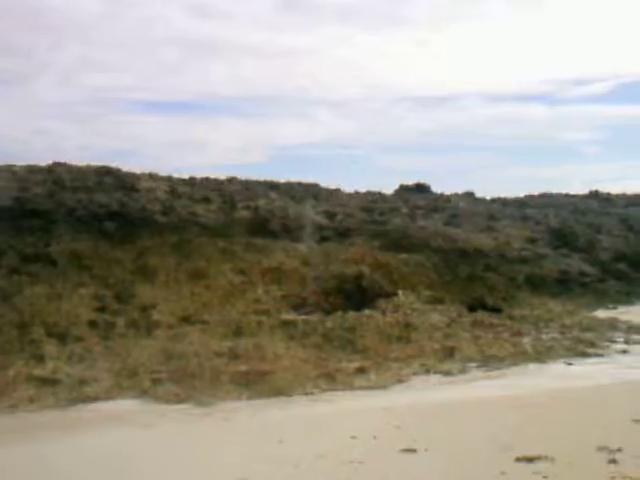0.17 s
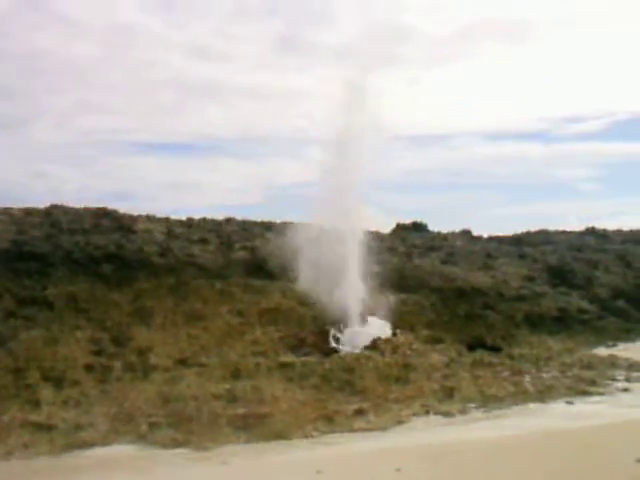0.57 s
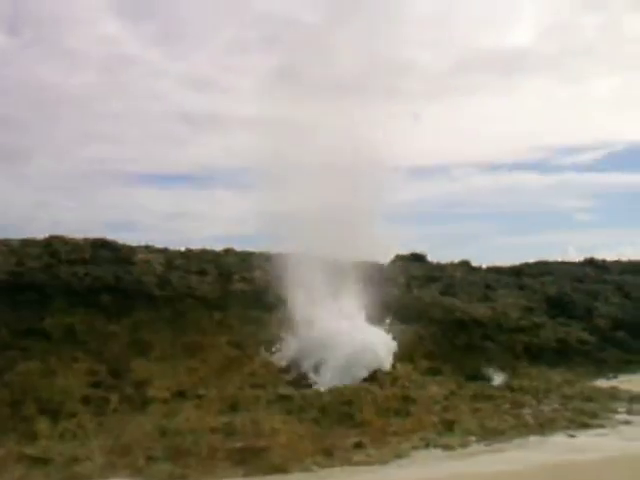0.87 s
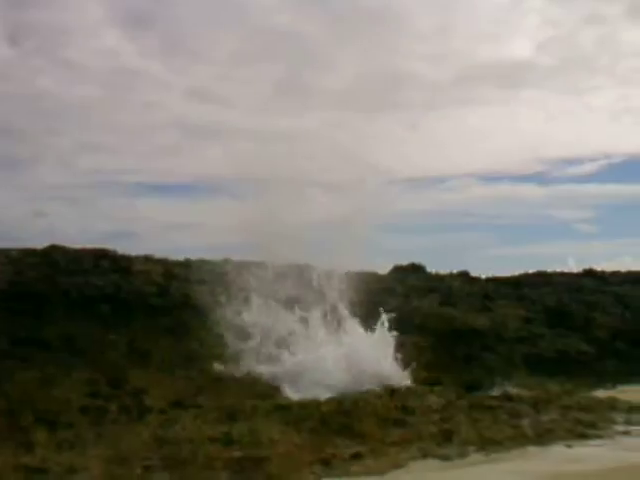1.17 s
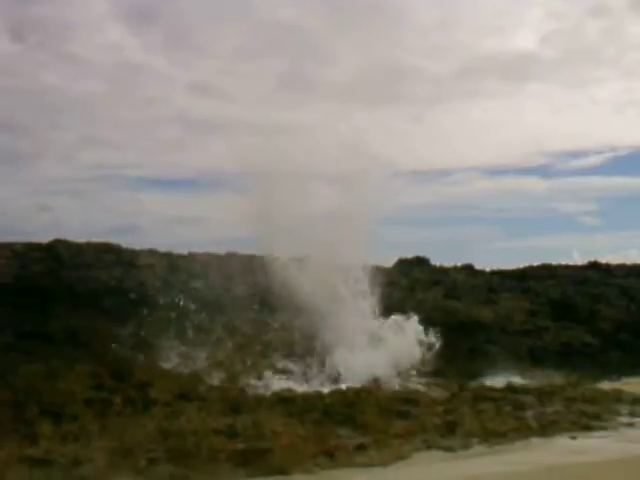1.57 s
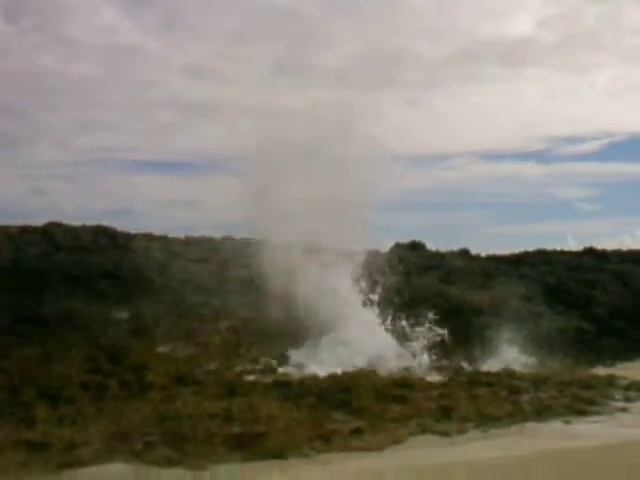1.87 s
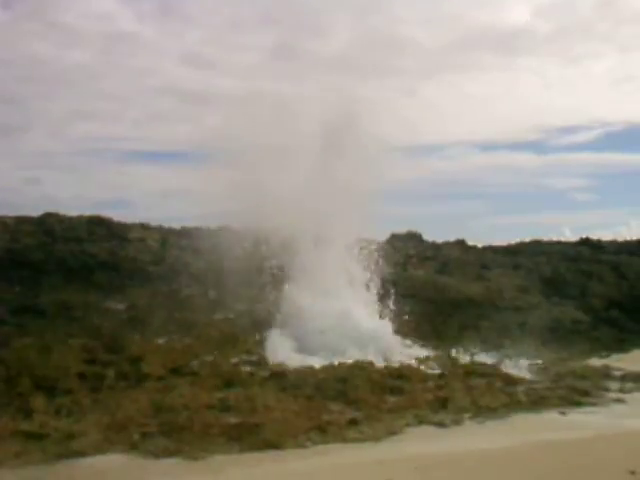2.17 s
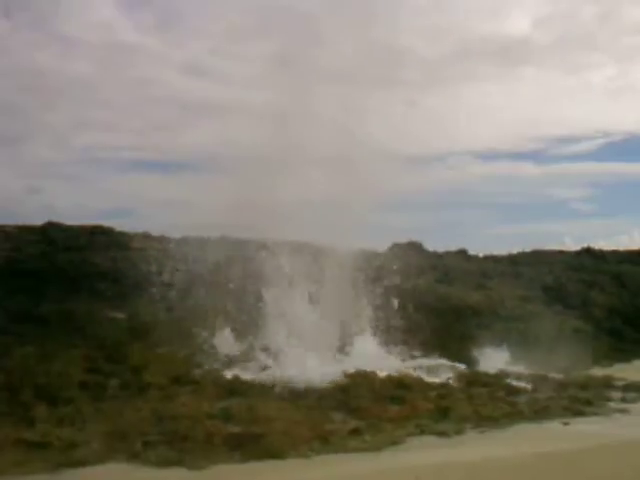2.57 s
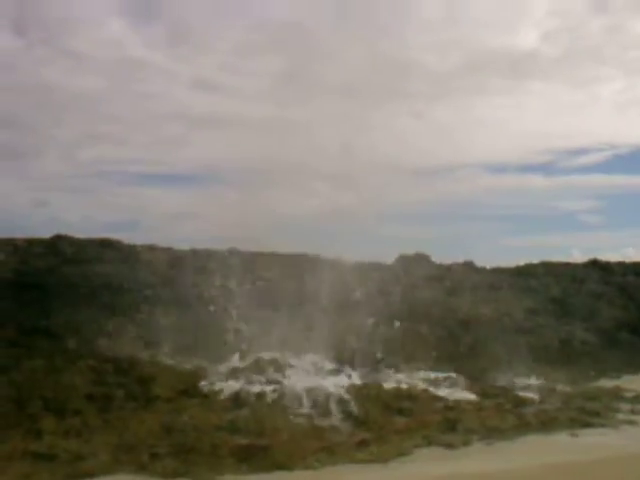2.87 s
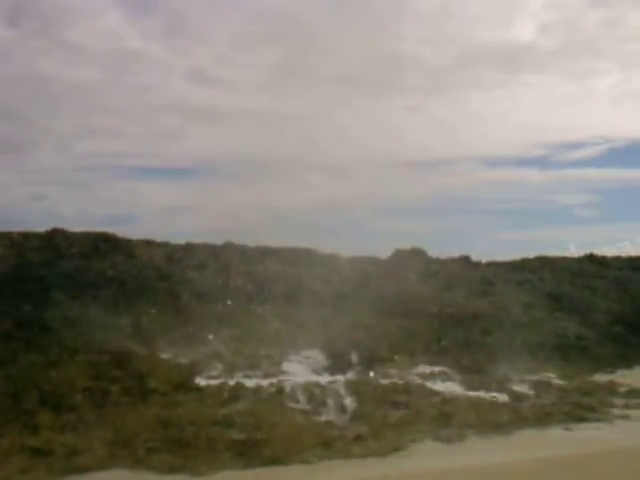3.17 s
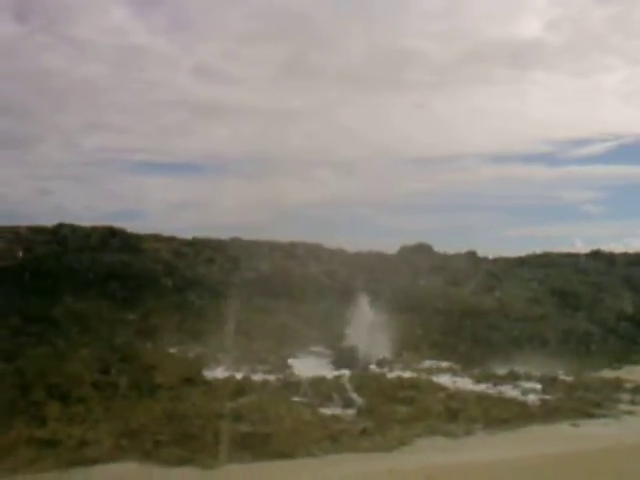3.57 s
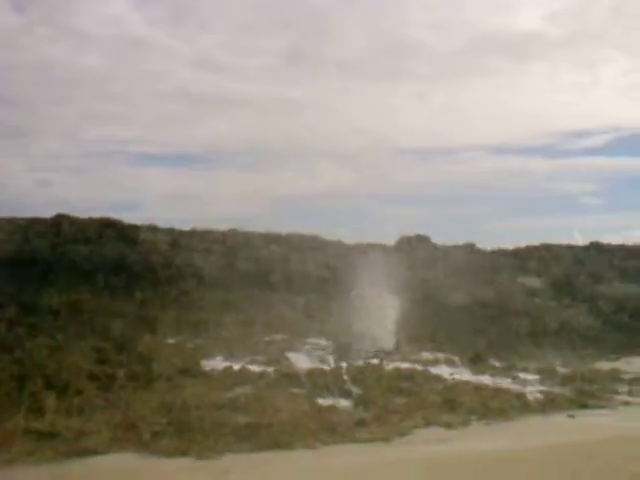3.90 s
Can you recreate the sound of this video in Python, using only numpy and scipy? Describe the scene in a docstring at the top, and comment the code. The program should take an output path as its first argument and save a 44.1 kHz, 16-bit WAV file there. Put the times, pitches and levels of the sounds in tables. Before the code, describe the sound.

A microphone pops right at the start, over a faint, steady hiss of sea. By 0.3 seconds a rocky blowhole begins to boom, with a low thump of water inside the cave. Air and sea water rush out in a hollow, slightly ringing roar, loudest from about 0.6 to 0.9 seconds, with the hardest thump near 0.6. After a brief dip, a second surge runs from about 1.2 to 2.2 seconds, with several more thumps and hissing spray. The boom and roar then fade. Spray patters back onto the rocks, thickest around 3 seconds, and a few big drops splat nearby between 2.7 and 4 seconds. The hole gives one more weak, low blow around 3.3 to 3.6 seconds. Everything is outdoors and sounds dull, with little treble.

```python
"""A small, dull-sounding microphone switches on with a pop, over the faint hiss of the sea.
A swell drives air and sea water out of a rocky blowhole: the cave booms, slugs of water slam into it,
and the jet roars through the ringing rock throat. A second blow follows close behind.
The spray patters back on the rocks, a few big drops splat nearby, and the hole blows weakly once more."""
import sys
import numpy as np
from scipy import signal
from scipy.fft import rfft, irfft
from scipy.io import wavfile
from scipy.ndimage import uniform_filter1d

SR = 44100
rng = np.random.default_rng(int(sys.argv[2]) if len(sys.argv) > 2 else 0)


def wav_out(sig):
    """Save sig, one row per channel (or a flat mono array), as 16-bit PCM at SR to the path in sys.argv[1]."""
    wavfile.write(sys.argv[1], SR, np.round(np.clip(np.atleast_2d(sig).T, -1, 1) * 32767).astype(np.int16))


N = 177943
TIME = np.arange(N) / SR
HZ = np.fft.rfftfreq(N, 1 / SR)
FULL_SURGE_DB, FULL_JET_DB = -22, -28  # cave pressure and jet strength that count as a full blow

# Pressure of the air trapped in the cave. Each row: time in seconds, relative level in dB.
CAVE_PRESSURE = [(0.12, -36), (0.33, -26), (0.52, -24), (0.66, -20), (0.92, -22), (1.02, -27.5),
                 (1.22, -24.5), (1.6, -25), (1.78, -25), (2.0, -25.5), (2.33, -29.5), (2.52, -34.5),
                 (2.95, -35), (3.3, -32.5), (3.58, -33.5), (3.72, -39), (4.03, -38)]
# Strength of the jet leaving the hole. Each row: time in seconds, relative level in dB.
JET_STRENGTH = [(0.14, -43), (0.44, -30), (0.7, -26.5), (0.77, -27.5), (0.93, -36), (1.2, -34.5),
                (1.45, -28.5), (2.26, -35.5), (2.46, -38), (3.3, -39), (3.8, -42), (4.0, -39)]
# A drained cave booms brighter than a flooded one. Each row: time in seconds, tilt in dB per octave.
CAVE_BRIGHTNESS = [(0.1, 2.5), (0.8, -1), (1.05, 0), (1.4, -5), (1.8, 1), (2.4, 4), (4.03, 1)]
# Slugs of water hitting the cave.
# Each row: time of the peak in seconds, relative level in dB, pitch in Hz, half-length in seconds.
WATER_SLAMS = [(0.328, -13.5, 103, 0.012), (0.625, -8.5, 208, 0.006), (0.675, -18, 105, 0.009),
               (0.935, -17.5, 226, 0.017), (1.176, -15.5, 194, 0.012), (1.232, -14.5, 137, 0.011),
               (1.365, -15.5, 197, 0.01), (1.53, -13, 178, 0.0076), (1.592, -13, 140, 0.0056),
               (2.121, -14.5, 225, 0.0058), (2.196, -33, 82, 0.014), (2.667, -25.5, 248, 0.0069),
               (3.118, -31, 220, 0.015)]
# Spray raining back. Each row: thickest moment in seconds, half-length in seconds, relative level in dB.
SPRAY_SHOWERS = [(1.81, 0.49, -44), (3.081, 0.42, -40), (3.6, 0.1, -55), (3.947, 0.34, -49)]
# Big drops landing on rock nearby. Each row: start in seconds, relative level in dB.
BIG_DROPS = [(2.7547, -29.5), (2.9941, -39), (3.5227, -39.5), (3.5518, -27), (3.595, -25.5), (3.9185, -31),
             (3.985, -29.5)]
# Tones the rock throat rings at. Each row: pitch in Hz, half-width in Hz, relative level in dB.
THROAT_TONES = [(685, 25, -3), (889.4, 18, -1.5), (930, 45, 2), (1024, 17, 4), (1151, 27, -2.5),
                (1446, 25, -9), (1715, 14, -8)]
# The tone colours of four sounds. Each row: frequency in Hz, relative level in dB.
BOOM_COLOUR = [(40, -30.5), (100, -19), (130, -11), (155, -3.5), (180, -2), (213, -0.5), (260, -7.5),
               (320, -7), (400, -14.5), (455, -13.5), (530, -26), (900, -44)]  # trapped air
HEAVE_COLOUR = [(12, -22), (25, -14), (50, -3.5), (85, 2.5), (115, 2), (170, -8.5), (400, -50.5)]  # heaving water
ROAR_COLOUR = [(250, -10.5), (430, 1), (545, -6.5), (640, 1.5), (810, 1), (1000, -6.5), (1230, 2),
               (1320, -2), (1520, -0.5), (1780, -3.5), (2250, -13), (3000, -19.5), (4400, -33.5)]  # the jet
HISS_COLOUR = [(200, -8.5), (500, 1.5), (850, -5), (1300, -6), (1750, 1.5), (2350, -2.5), (3000, -2),
               (3400, 0), (3700, 3), (4050, -8), (4400, -13)]  # spray and sea


def gain_of(db):
    """Turns decibels into a number to multiply a sound by."""
    return 10 ** (np.asarray(db) / 20)


def evened(x):
    """Scales a signal to an average size (rms) of 1."""
    return x / np.sqrt(np.mean(x ** 2) + 1e-20)


def follow(rows, lead_s=0):
    """Joins a table's points with straight lines, read lead_s seconds ahead."""
    s, value = np.transpose(rows)
    return np.interp(TIME + lead_s, s, value)


def filtered(x, gains):
    """Turns each frequency up or down by its gain; rms 1."""
    return evened(irfft(rfft(x) * gains, N))


def coloured(x, colour):
    """Gives a sound the tone colour drawn in a table; rms 1."""
    hz, db = np.transpose(colour)
    return filtered(x, gain_of(np.interp(np.log(HZ + 1), np.log(hz), db)))


def band(x, centre_hz, width_hz):
    """Keeps the frequencies around centre_hz; rms 1."""
    return filtered(x, np.exp(-((HZ - centre_hz) / width_hz) ** 2))


def low_pass(x, hz):
    """Cuts away the treble above hz."""
    return signal.oaconvolve(x, signal.firwin(255, hz, window=("kaiser", 9), fs=SR), "same")


def brightened(x, tilt_db, low_hz, high_hz):
    """Brightens or dulls a sound over time, by tilt_db per octave between two frequencies; rms 1."""
    hz, t, spectra = signal.stft(x, SR, nperseg=1024)
    octaves = np.log2(np.clip(hz, low_hz, high_hz) / np.sqrt(low_hz * high_hz))[:, None]
    tilted = spectra * gain_of(octaves * np.interp(t, TIME, tilt_db))
    return evened(signal.istft(tilted, SR, nperseg=1024)[1][:N])


def drift(rate_hz):
    """A smooth random wandering; rms 1."""
    return filtered(rng.standard_normal(N), np.exp(-(HZ / rate_hz) ** 2) * (HZ > 0))


def impacts(per_s, spread_db):
    """Clicks at random times, many small and a few large."""
    size = gain_of(spread_db * np.minimum(rng.exponential(1, N), 4))
    return evened(size * rng.choice([-1, 1], N) * (rng.random(N) < per_s / SR))


def wet_noise(per_s, spread_db, drops_db, clump_db):
    """A fine hiss with heavier drops that come in clumps; rms 1."""
    clumps = drift(rate_hz=70)
    drops = impacts(per_s, spread_db) * gain_of(drops_db + clump_db * clumps)
    return coloured(rng.standard_normal(N) + drops, HISS_COLOUR)


def churn(colour, steadiness, hold_s):
    """Swirling noise, its loudness partly held steady by the push of the water behind it."""
    noise = coloured(rng.standard_normal(N), colour)
    window = signal.windows.hann(int(hold_s * SR))
    power = signal.fftconvolve(noise ** 2, window / window.sum(), "same")
    return evened(noise / np.maximum(power, 1e-6) ** (steadiness / 2))


def sea_wash(level_db=-53):
    """The sea hisses faintly and steadily along the shore."""
    return gain_of(level_db) * coloured(rng.standard_normal(N), HISS_COLOUR)


def showers(patter_db=2.4, spatter_db=-8):
    """Thrown water patters down, thickening and thinning out; nearer drops spatter brightly."""
    patter = wet_noise(per_s=1100, spread_db=5, drops_db=-1, clump_db=1)
    spatter = band(impacts(per_s=95, spread_db=2), centre_hz=3750, width_hz=550)
    power = sum(gain_of(db) ** 2 * np.exp(-((TIME - s) / half_length) ** 2)
                for s, half_length, db in SPRAY_SHOWERS)
    return (gain_of(patter_db) * patter + gain_of(spatter_db) * spatter) * np.sqrt(power)


def splats(gain_db=-4, decay_s=0.0028):
    """Each big drop bursts into a few milliseconds of bright fizz."""
    fizz = band(rng.standard_normal(N), centre_hz=3350, width_hz=900)
    bursts = sum(gain_of(db) * (TIME >= s) * np.exp(-abs(TIME - s) / decay_s) for s, db in BIG_DROPS)
    return gain_of(gain_db) * fizz * bursts


def mist(full_blow_db=-39, growth=0.9):
    """Spray torn off the jet hisses in step with it."""
    hiss = wet_noise(per_s=3000, spread_db=2, drops_db=-2, clump_db=2.4)
    return hiss * gain_of(full_blow_db + growth * (follow(JET_STRENGTH) - FULL_JET_DB))


def throat(loudest_db=-34, full_pressure_db=-25, low_pressure_db=-34):
    """Escaping air keeps the hollow rock ringing; at low pressure the ring dies away faster."""
    peaks = sum(gain_of(db) / (1 + ((HZ - hz) / width) ** 2) for hz, width, db in THROAT_TONES)
    ring = filtered(rng.standard_normal(N), peaks)
    late_db = follow(CAVE_PRESSURE, lead_s=-0.05)  # the ring lags behind the pressure
    pressure_db = uniform_filter1d(late_db, int(0.26 * SR))  # the narrow throat evens out the swings
    drive_db = 0.97 * np.minimum(pressure_db - full_pressure_db, 0)
    choke_db = 2.6 * np.minimum(pressure_db - low_pressure_db, 0)
    return ring * gain_of(loudest_db + drive_db + choke_db)


def cave(boom_db=-0.48, heave_db=-29, heave_growth=1.017):
    """Trapped air booms near 200 Hz above the deeper heave of the water that squeezes it."""
    air = churn(BOOM_COLOUR, steadiness=0.45, hold_s=0.11)
    air = brightened(air, follow(CAVE_BRIGHTNESS), low_hz=188, high_hz=467)
    boom = air * gain_of(follow(CAVE_PRESSURE) + boom_db)
    water = churn(HEAVE_COLOUR, steadiness=0.25, hold_s=0.38)
    push_db = follow(CAVE_PRESSURE, lead_s=0.1) - FULL_SURGE_DB  # the water heaves first
    return boom + water * gain_of(heave_db + heave_growth * push_db)


def slams(gain_db=-1):
    """Each slug of water squeezes the air for a few cycles, making a short thump."""
    thumps = np.zeros(N)
    for s, db, hz, half_length in WATER_SLAMS:
        pulse = np.exp(-((TIME - s) / half_length) ** 2)
        thumps += gain_of(db + gain_db) * pulse * np.sin(2 * np.pi * hz * (TIME - s))
    return thumps


def jet(gain_db=-0.63, sputter_db=0.54):
    """Air tears the water into bursts; the stronger the jet, the brighter its roar."""
    strength_db = follow(JET_STRENGTH)
    tearing = coloured(impacts(per_s=7000, spread_db=3.5), ROAR_COLOUR)
    tilt_db = 0.76 + 0.267 * (strength_db - FULL_JET_DB)
    roar = brightened(tearing, tilt_db, low_hz=450, high_hz=2980)
    return roar * gain_of(strength_db + gain_db + sputter_db * drift(rate_hz=23))


def scene():
    """The blowhole in the open air, heard from one spot."""
    return (cave() + slams() + jet() + throat() + mist() + showers() + splats() + sea_wash())[None]


def record(dry):
    """A microphone with little treble; at switch-on its voltage jumps with a pop and leaks away."""
    switch_on_s, leak_s = 0.07253, 0.28
    dulled = low_pass(dry[0], hz=4250)
    pop = -0.42 * np.exp(-abs(TIME - switch_on_s) / leak_s)
    return low_pass((dulled + pop) * (TIME >= switch_on_s), hz=16500)[None]


dry = scene()
out = record(dry)
wav_out(out)
```